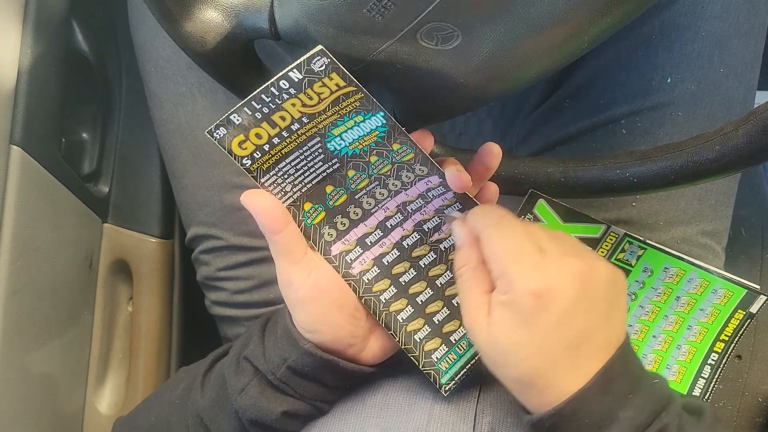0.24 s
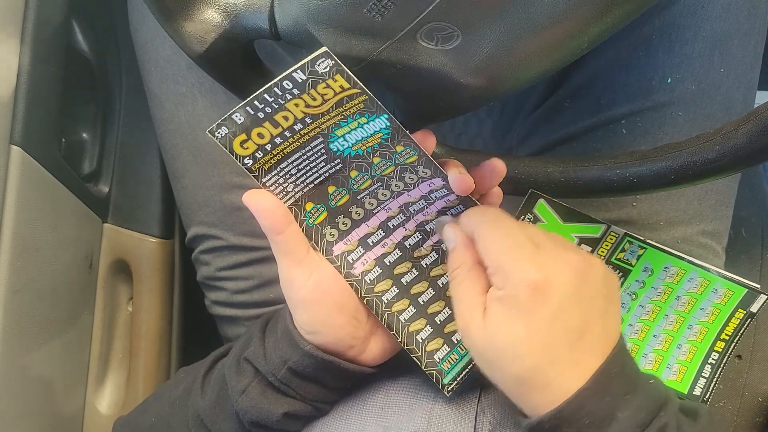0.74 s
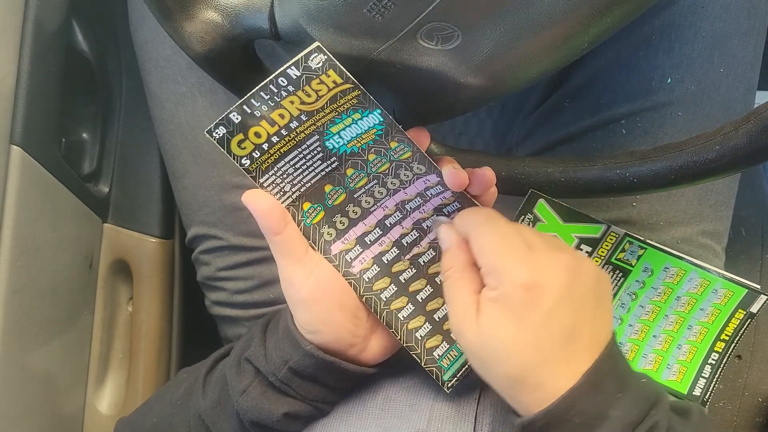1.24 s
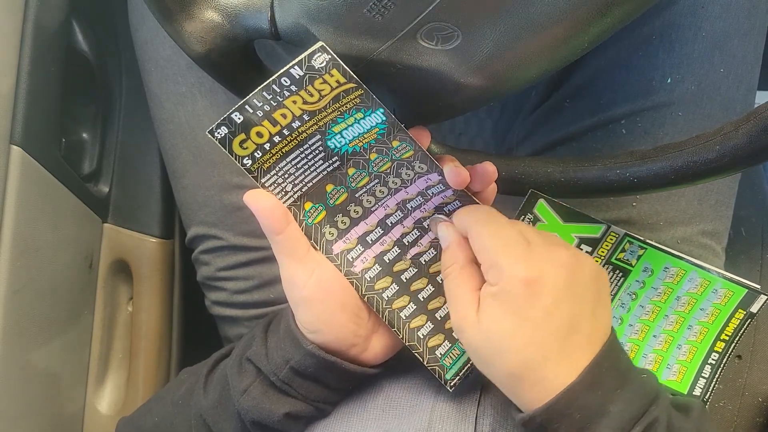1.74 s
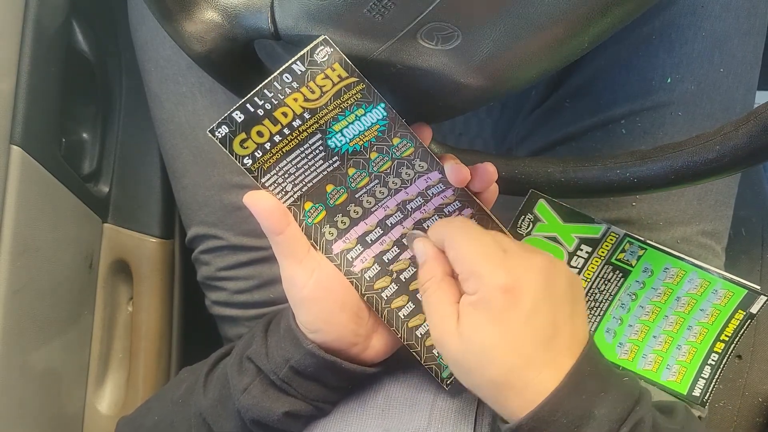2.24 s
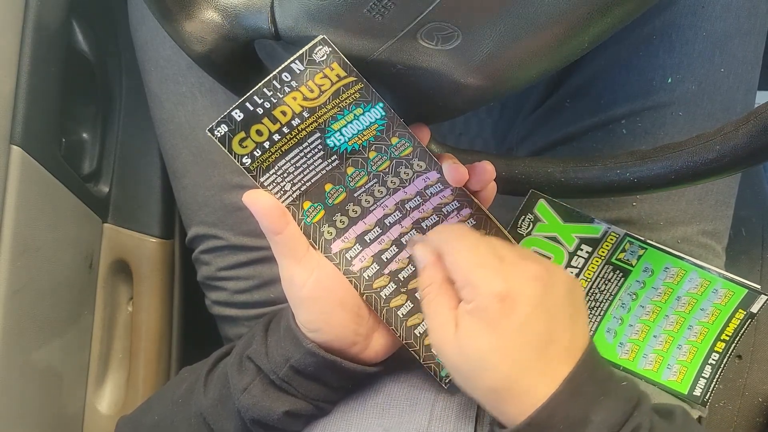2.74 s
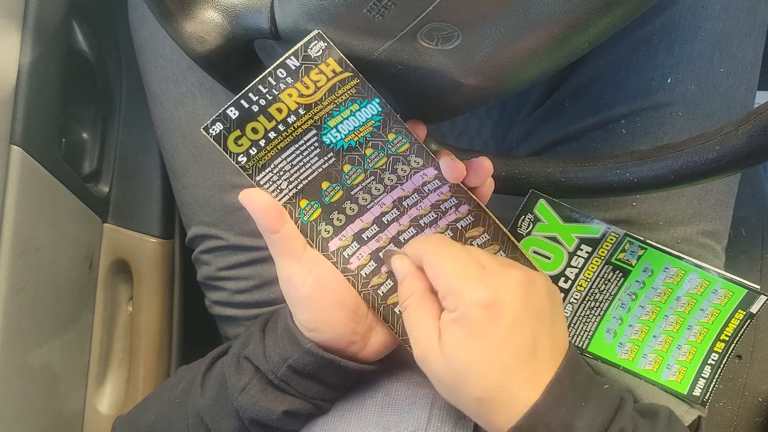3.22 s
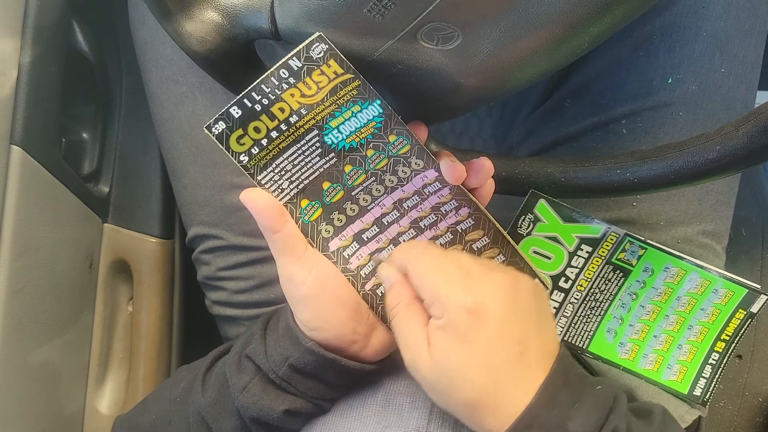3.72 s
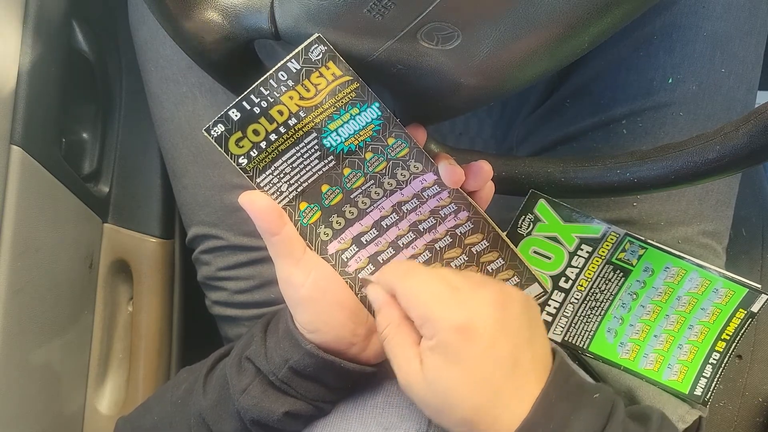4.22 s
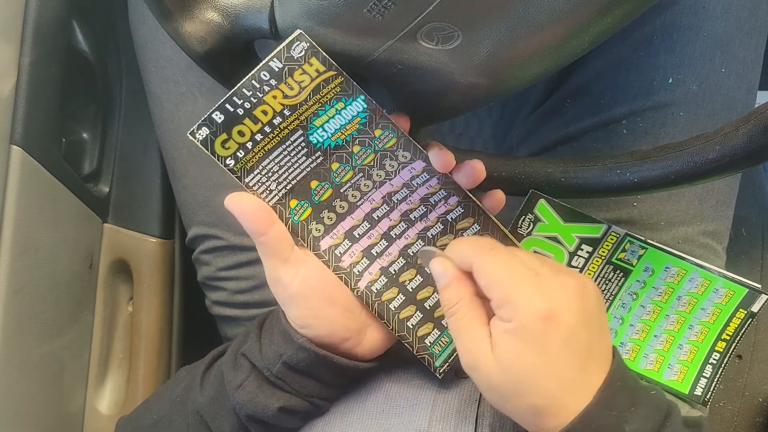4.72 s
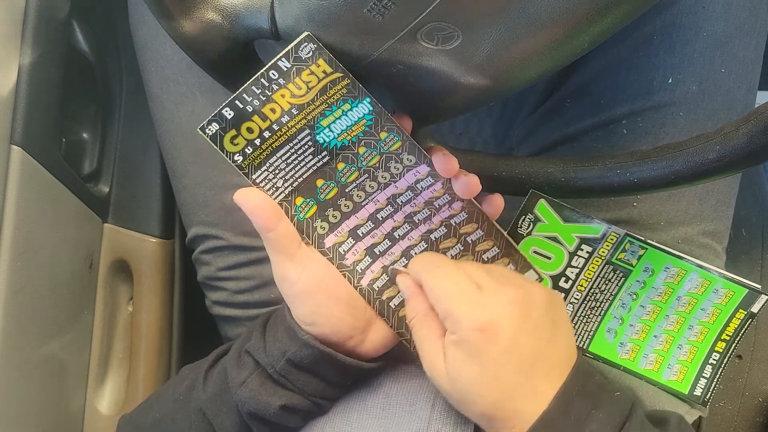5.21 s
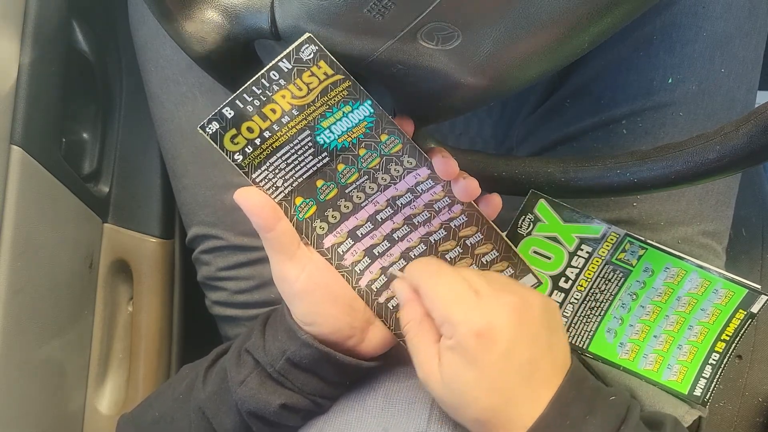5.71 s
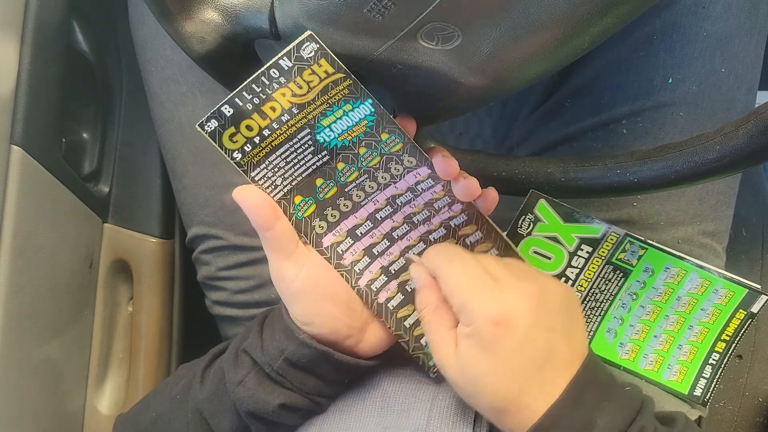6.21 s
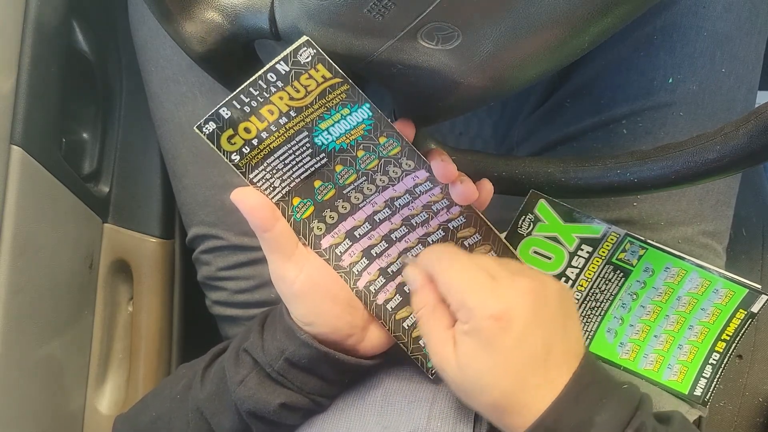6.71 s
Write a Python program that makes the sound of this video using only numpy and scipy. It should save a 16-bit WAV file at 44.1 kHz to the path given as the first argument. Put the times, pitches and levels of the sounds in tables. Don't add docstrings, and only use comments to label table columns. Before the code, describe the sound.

Close, dry, lumpy scratching on a card held in the hand: short alternating push and pull rasps at a steady fast pace, with small snags and sharp ticks. The scraping grows stronger past three seconds, pauses around four and a half to just over five, then carries on softer and a little more sparkling. A deep, quiet boom comes through the car body. Small padded interior, close handheld stereo pickup.

```python
import sys
import numpy as np
from scipy import signal
from scipy.fft import rfft, irfft, next_fast_len
from scipy.io import wavfile
from scipy.ndimage import uniform_filter1d

SR = 44100
rng = np.random.default_rng(int(sys.argv[2]) if len(sys.argv) > 2 else 0)


def rack_gain(trim_db):
    fader = np.asarray(trim_db, float)
    return 10 ** (fader / 20)


def bounce(signal):
    frames = np.transpose(np.atleast_2d(signal))
    limited = np.clip(frames, -1, 1)
    pcm = np.round(limited * 32767).astype(np.int16)
    wavfile.write(sys.argv[1], SR, pcm)


N = 306495


def rms_one(x):
    return x / np.sqrt(np.mean(x ** 2) + 1e-20)


def in_time(rows):
    seconds, *columns = np.transpose(rows)
    return [np.interp(np.arange(N) / SR, seconds, column) for column in columns]


def drift(rate_hz, size=()):
    steps = rng.standard_normal((*size, 4000))
    at = np.arange(N) / SR * np.clip(rate_hz, .1, 500)
    joined = np.apply_along_axis(lambda row: np.interp(at, np.arange(4000), row), -1, steps)
    return joined * 1.22


def coloured(x, hz, db):
    size = next_fast_len(N)
    log_hz = np.log(np.maximum(np.arange(size // 2 + 1) * SR / size, 1))
    gain = rack_gain(np.interp(log_hz, np.log(hz), db))
    return irfft(rfft(x, size) * gain, size)[..., :N]


def resonance(x, hz, width_hz):
    r = np.exp(-np.pi * width_hz / SR)
    top = np.array([1, 0, -1]) * (1 - r * r) / 2
    return signal.lfilter(top, [1, -2 * r * np.cos(2 * np.pi * hz / SR), r * r], x)


# frequency in Hz, left and right level in dB per Hz.
GRIT_HISS = [(3000, -64, -54), (4880, -15, 1), (5100, -8, -10), (5630, -22, -9.5), (6760, -25, -10),
             (8100, -30, -6.5), (9460, -18, -11.5), (10800, -11.5, -10.5), (12300, -10.5, -8.5),
             (14000, -12, -10.5), (15900, -15, -20)]


def scratching():
    level_db, grit_db = pressure()
    contact = rack_gain(level_db - 1.5 + 2.77 * drift(70.0)) + snags()
    body = card(contact * grains(1600, 2.4) + taps(), contact * grains(1600, 3.0))
    fine = fine_tearing(contact, grit_db)
    hz, left_db, right_db = np.transpose(GRIT_HISS)
    hiss = np.array([coloured(fine[0], hz, left_db), coloured(fine[1], hz, right_db)])
    return rack_gain(13.5) * body + rack_gain(5.0) * patchy(hiss) + rack_gain(26.5) * coin_edge(fine) + bumps()


# start in seconds, length in seconds, strength in dB,
# lean in dB (more force at the bite than at the run-out).
PUSHES = [(.054, 0.058, -31.5, 4), (.321, 0.061, -36, 4), (.57, 0.073, -34, 7), (.822, 0.068, -31.5, 2),
          (1.061, 0.055, -37, 3.5), (1.292, 0.067, -34, 4), (1.536, 0.066, -30, -1),
          (1.781, 0.063, -32.5, 2.5), (2.029, 0.056, -37.5, -3.5), (2.269, .065, -31.5, 2.5),
          (2.504, 0.064, -37, 7), (2.745, 0.069, -41.5, 9.5), (2.997, 0.057, -38, 2),
          (3.249, 0.049, -25.5, 3), (3.474, .074, -33, 5.5), (3.705, 0.057, -26.5, 1.5),
          (3.957, 0.055, -35.5, 6), (4.17, 0.043, -35, 1), (4.398, 0.043, -30, 2.5),
          (4.607, 0.027, -37.5, 3), (5.244, 0.071, -37, 8.5), (5.495, 0.056, -32, 4.5),
          (5.718, 0.06, -32, -0.7), (5.962, 0.052, -33, 3.5), (6.196, 0.08, -37.5, -1.5),
          (6.457, 0.07, -33, -3), (6.692, 0.069, -37.5, 1.5), (6.934, 0.017, -44, 3)]
PULLS = [(0.0, 0.018, -57.5, 8.5), (.163, 0.083, -31.5, -3), (.441, .069, -33.5, 1), (.675, 0.095, -32, 0),
         (.929, 0.067, -33.5, 1.5), (1.153, 0.079, -36, -3), (1.396, 0.089, -38, -1),
         (1.64, 0.078, -35.5, 1.8), (1.883, .089, -36, 0.5), (2.12, 0.083, -34.5, -2.2),
         (2.375, 0.069, -35.5, -3.5), (2.633, 0.055, -37, 1), (2.856, 0.07, -37, 0.5),
         (3.098, .1, -39, 5.5), (3.35, 0.068, -30, -3.5), (3.583, 0.069, -33.5, -4.5),
         (3.819, 0.058, -32.5, 1.5), (4.05, 0.07, -33, -3), (4.281, 0.061, -34, -5.5),
         (4.497, 0.069, -34.5, 2), (4.75, .095, -57, 5.5), (5.117, 0.046, -52.5, 9),
         (5.371, .068, -39, 6.5), (5.606, .058, -36, 6), (5.838, 0.042, -32.5, 0.5),
         (6.079, 0.051, -33.5, -1), (6.342, 0.066, -40.5, 9), (6.58, .057, -39, 5.5),
         (6.822, 0.053, -35, 4)]


def strokes():
    usual_db, soft_limit_db = -34, 13.5
    rows = []
    for table, swell_db, pull in ((PUSHES, 1.27, 0), (PULLS, 2.5, 1)):
        for start, length, db, lean in table:
            soft_db = min(usual_db - db, soft_limit_db)
            bite_db, out_db = db + lean - swell_db, db - lean - swell_db
            rows.append((start, length, bite_db, db + swell_db, out_db, pull, soft_db))
    return sorted(rows)


def direction():
    return in_time([(start + part * length, pull, soft_db)
                    for start, length, *_, pull, soft_db in strokes() for part in (0, 1)])


# time in seconds, looseness of the grip
# in dB, grit over card in dB, bow of the card as dB on its high panel.
GRIP = [(0, 1, -20, 1.5), (.5, -2, -17.5, 0.5), (1.0, 0, -19, -1.5), (1.3, -1.5, -20, -0.5),
        (1.8, -3, -21, -0.5), (2.3, 2, -17.5, -0.5), (2.9, 1.5, -15.5, 1), (3.3, -0.5, -17.5, 3.5),
        (3.8, -0.5, -18.5, 2.5), (4.4, -5, -19, 1), (4.65, 4, -20.5, 1), (5.25, -1.5, -25, -2),
        (5.45, 4, -22, -0.5), (5.8, 1.8, -22, 0), (6.1, 1, -23, 0), (6.45, -1, -17, -2.5),
        (6.72, 7, -17, 2), (6.95, 2.5, -19.5, 1)]


def pressure(rise_s=0.0066, fall_s=0.012, edge_db=-22):
    level = []
    for start, length, bite_db, middle_db, out_db, pull, _ in strokes():
        end = start + length
        risen_s, onset_db = (rise_s, -4.5) if pull else (rise_s * 0.92, -1)
        level += [(start - .02, -90),
                  (start - rise_s / 2, bite_db - 19.0),
                  (start + risen_s, bite_db + onset_db),
                  (start + 0.24 * length, bite_db),
                  (start + 0.54 * length, middle_db),
                  (start + 0.94 * length, out_db),
                  (end, out_db - 3),
                  (end + fall_s, out_db + edge_db),
                  (end + 2 * fall_s, -90)]
    level = np.array(level)
    level[:, 0] = np.maximum.accumulate(level[:, 0])
    pull, soft_db = direction()
    grit_db = in_time(GRIP)[1] + 2.5 * pull + 0.11 * soft_db
    return in_time(level)[0], grit_db


def grains(per_s, spread_db, evening_size=350):
    sizes = rack_gain(spread_db * np.minimum(rng.exponential(1, N), 4)) * rng.choice([-1, 1], N)
    tears = rms_one(sizes * (rng.random(N) < per_s / SR))
    return rms_one(tears / np.sqrt(0.88 + uniform_filter1d(tears ** 2, size=evening_size)))


# time in seconds, peak in dB.
SNAGS = [(.163, -27), (.1976, -10.5), (0.229, -24), (0.3676, -19.5), (.461, -38), (0.836, -16),
         (1.2037, -18.5), (1.306, -18), (1.4515, -28), (1.9136, -32), (1.931, -34), (2.0523, -24),
         (2.067, -20.5), (2.121, -31), (2.3742, -21), (3.372, -18.5), (3.486, -22), (3.607, -18.5),
         (3.9603, -15.5), (4.0973, -19), (4.197, -9.5), (4.5431, -37), (5.257, -21), (5.752, -27),
         (6.098, -24), (6.2072, -22.5), (6.244, -19), (6.4773, -13), (6.7163, -21), (6.826, -26.5)]


def snags(release_s=0.0056):
    kicks = np.zeros(N)
    bites = [(start + .005, bite_db + (6 if pull else 3)) for start, _, bite_db, *_, pull, _ in strokes()]
    for s, peak_db in SNAGS + bites:
        kicks[round((s - .0025) * SR)] += rack_gain(peak_db - 13.0)
    return signal.lfilter([1], [1, -np.exp(-1 / (release_s * SR))], kicks + 1e-18)


# time in seconds, peak in dB.
TAPS = [
    (4.757, -45.5),
    (4.851, -53),
    (4.956, -55),
    (5.12, -41),
]


def taps():
    clicks = np.zeros(N)
    landings = [(start + .002, bite_db - 8) for start, _, bite_db, *_, pull, _ in strokes() if not pull]
    for s, peak_db in TAPS + landings:
        clicks[round(s * SR)] = rack_gain(peak_db + 19.5)
    return clicks


# time in seconds, place (0 middle of the card, 1 near the low edge),
# sparkle in dB.
PLACE = [(0, 0.67, -1), (.8, 0.38, -3.5), (1.6, 0.49, 3.5), (2.3, 0.38, -1.5), (3.1, 0.47, 0),
         (3.3, 1.16, -3), (4.0, 0.88, -6), (4.6, 0.84, 3.5), (5.2, 0.92, 6.5), (6.0, 1.11, 7),
         (6.6, 0.91, 0), (6.95, 1.4, 0)]
PANEL_EDGES_HZ = [1300, 2200, 2800]


def grip():
    pull, soft_db = direction()
    loose_db, _, bow_db = in_time(GRIP)
    place = in_time(PLACE)[0]
    flexing_db = loose_db + 2.5 * pull + 0.38 * soft_db
    low_db = 0.76 * loose_db + 1.8 * pull - 2.5 * place + 1.5
    high_db = bow_db + 2.5 * pull - 1.96
    return flexing_db, low_db, high_db


# frequency in Hz, width in Hz, left and right level in dB,
# change at the low edge in dB.
CARD = [(306, 69, -17.5, -24.5, 1.5), (529, 53, -16, -29.5, -2.5), (734, 34.7, -26.5, -12, 4.5),
        (928, 88, -16.5, -13, -3.1), (1176, 159, -15.5, -24, 4), (1389, 55, -24, -13.5, 3.4),
        (1505.4, 53, -5.5, -17.5, 1), (1802, 86, 0, -2.5, -6.5), (2029, 130, -6, -5.5, -3.5),
        (2343, 140, 2.5, -4.5, -2.8), (2656, 158, 3.5, 3.5, -2), (2910, 155, 0.5, -1.5, -0.5),
        (3171, 123, -2, -3.5, 2.5), (3555, 290, -6.5, -4, -1), (3940, 137, -1, 1, -9),
        (4306, 174, -31, -8, -5.5), (4530, 214, 5.5, -11.5, -26)]


def card(force, other):
    port_lag, port_turn = 3, 1.042
    place, out = in_time(PLACE)[0], np.zeros((2, N))
    flexing_db, low_db, high_db = grip()
    panels_db = (flexing_db, low_db, 0, high_db)
    for k, (hz, width_hz, left_db, right_db, edge_db) in enumerate(CARD):
        panel_db = panels_db[np.searchsorted(PANEL_EDGES_HZ, hz)]
        wander = rack_gain(edge_db * place + panel_db + 2.58 * drift(16.0))
        shared = resonance(force * wander, hz, width_hz)
        apart = resonance(other * wander, hz, width_hz)
        face = -1 if 600 < hz < 1450 else 1
        ringing = shared * [[1], [face]] + 0.2 * apart * [[1], [-face]]
        out += (-1) ** k * ringing * rack_gain([[left_db], [right_db]])
    late = signal.hilbert(np.roll(out[0], port_lag), next_fast_len(N))[:N]
    out[0] = np.real(late * np.exp(-1j * port_turn))
    return signal.sosfilt(signal.butter(2, 5500, fs=SR, output="sos"), out)


def fine_tearing(contact, grit_db):
    common = grains(7000, 3.3)
    sliding = uniform_filter1d(contact, size=180)
    keep = np.exp(-1 / (0.0063 * SR))
    sliding = np.minimum(sliding, signal.lfilter([1 - keep], [1, -keep], sliding))
    sliding = 1.387 * sliding / np.sqrt(1 + sliding / rack_gain(-31))
    fine = np.array([(common + 1.22 * grains(9000, 3.0)) * sliding * rack_gain(grit_db) + 0.07 * taps()
                     for port in range(2)])
    fine[0] = -fine[0]
    return fine


def patchy(hiss):
    sparkle_db, out = in_time(PLACE)[1], 0
    for edge_hz in np.geomspace(4500, 14000, num=7):
        below = signal.sosfiltfilt(signal.butter(2, edge_hz, fs=SR, output="sos"), hiss)
        out = out + below * rack_gain(5.8 * drift(30.0) + sparkle_db * (edge_hz > 11000))
        hiss = hiss - below
    return out + hiss * rack_gain(4.8 * drift(25.0) + sparkle_db)


# frequency in Hz, width in Hz,
# left and right level in dB.
COIN_EDGE = [(5254, 220, -16, -17.5), (5654, 103, -17, -26.5), (6180, 54, -17, -20.5),
             (6580, 140, -22, -53), (6870, 74, -63, -19.5), (7460, 320, -24.5, -35.5),
             (9050, 130, -45, -29), (9730, 42, -35, -22), (12050, 370, -30, -38)]


def coin_edge(fine):
    out = 0
    for hz, width_hz, left_db, right_db in COIN_EDGE:
        driven = fine * rack_gain(4.33 * drift(25.0, size=(2,)))
        out = out + resonance(driven, hz, width_hz) * rack_gain([[left_db], [right_db]])
    return out


# time in seconds, peak in dB, pitch in Hz.
BUMPS = [(0.055, -48, 460), (0.327, -47, 513), (0.487, -43, 535), (1.194, -45, 324), (1.646, -49, 300),
         (1.889, -45, 320), (3.011, -44, 550), (3.134, -41.5, 520), (4.554, -44, 488), (4.85, -62, 316),
         (5.124, -41, 317), (5.605, -46, 313)]


def bumps():
    out, t = np.zeros(N + SR), np.arange(round(.06 * SR)) / SR
    for s, peak_db, pitch_hz in BUMPS:
        at = round(s * SR)
        fading = rack_gain(peak_db + 3.0 - 60 * t / 0.046) * np.minimum(t / 0.004, 1)
        out[at:at + len(t)] += fading * np.sin(2 * np.pi * pitch_hz * t)
    return out[:N] * rack_gain([[2.5], [-2.5]])


def cabin(x):
    t60_s, tail_db, cut_hz = 0.06, -15, 5400
    t = np.arange(round(.25 * SR)) / SR
    echoes = rng.standard_normal((2, len(t))) * rack_gain(-60 * t / t60_s) * (t > .002)
    echoes = signal.sosfilt(signal.butter(1, cut_hz, fs=SR, output="sos"), echoes)
    echoes /= np.sqrt(np.sum(echoes ** 2, axis=1, keepdims=True))
    return rack_gain(tail_db) * signal.fftconvolve(x, echoes, axes=1)[:, :N]


# time in seconds, deep level in dB.
RUMBLE = [(0, -45), (.45, -44), (.7, -43), (2.9, -42.5), (3.5, -46.5), (3.75, -41), (3.95, -46),
          (5.4, -48.5), (5.75, -51), (6.0, -49.5), (6.6, -44.5), (6.95, -50)]
# frequency in Hz, level in dB per Hz.
DEEP = [(14, -47), (28, -5), (39, 6.5), (47, 3.5), (55, 7.5), (66, 0), (110, -56.5)]
# frequency in Hz, level in dB per Hz.
CABIN_MID = [(30, -31), (70, 0), (92, -0.5), (112, -0.8), (140, -13.5), (180, -14), (230, -26),
             (260, -21.5), (340, -22.5), (400, -27.5), (800, -29), (1500, -41), (4000, -49.5), (14000, -86)]
# frequency in Hz, level in dB per Hz.
CABIN_SIDE = [(20, -51), (50, -11.5), (110, -12.5), (150, -40), (230, -28), (350, -27), (600, -26),
              (900, -29), (1500, -32.5), (4000, -53), (14000, -60)]


def rumble():
    deep_db, = in_time(RUMBLE)
    white = rng.standard_normal((3, N))
    deep = rms_one(coloured(white[0], *np.transpose(DEEP))) * rack_gain(deep_db)
    mid = coloured(white[1], *np.transpose(CABIN_MID))
    side = coloured(white[2], *np.transpose(CABIN_SIDE))
    air_db = -47 + .1 * (deep_db - deep_db.mean())
    air = (mid + side * [[1], [-1]]) / np.std(mid) * rack_gain(air_db)
    return (deep + air) * rack_gain([[.7], [-.7]])


def scene():
    near = scratching()
    return near + cabin(near) + rumble()


def top_cut(x):
    return signal.sosfilt(signal.butter(12, 16100, fs=SR, output="sos"), x)


# frequency in Hz,
# left and right gain in dB.
PORTS = [(7580, 0.05, -0.22), (8550, -21, -7), (9420, -21, -3.5), (11400, -1.5, 0.5), (12400, -3.5, 1.5),
         (15800, 2.5, 0.5), (15900, -61, -60)]


def record(dry):
    hz, left_db, right_db = np.transpose(PORTS)
    heard = np.array([coloured(dry[0], hz, left_db), coloured(dry[1], hz, right_db)])
    return top_cut(heard)


dry = scene()
out = record(dry)
bounce(out)
```